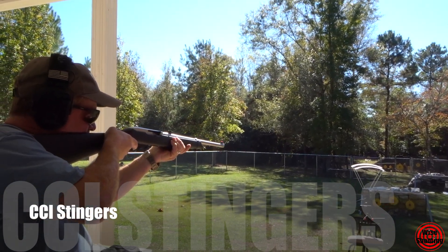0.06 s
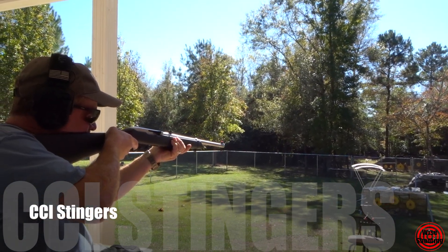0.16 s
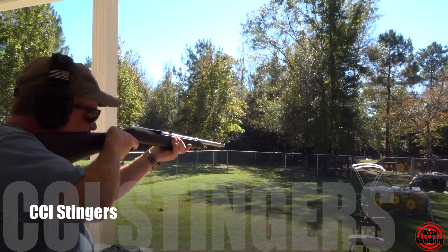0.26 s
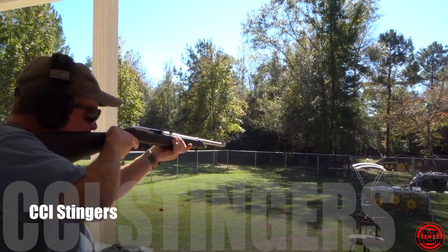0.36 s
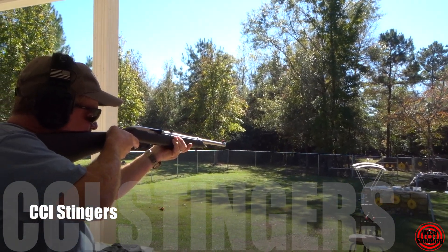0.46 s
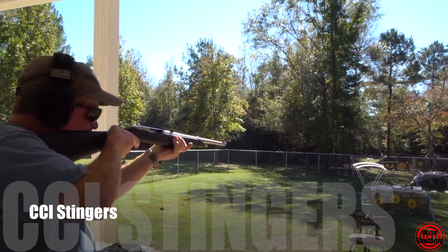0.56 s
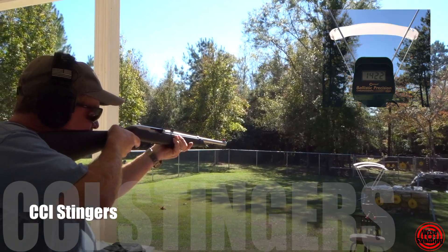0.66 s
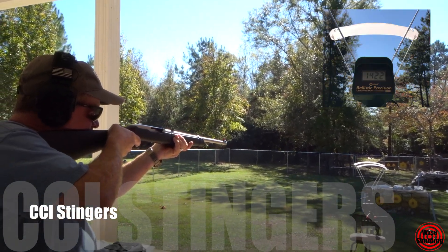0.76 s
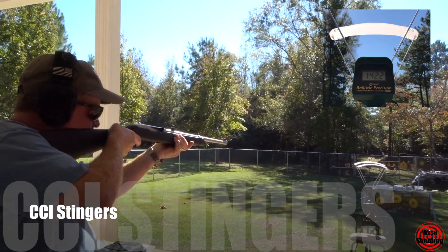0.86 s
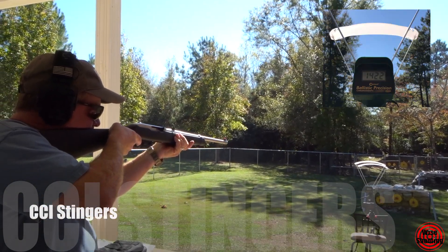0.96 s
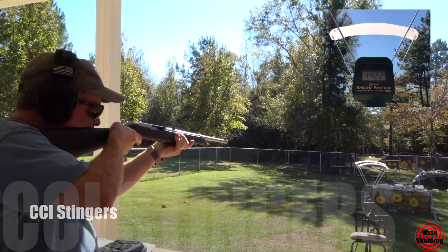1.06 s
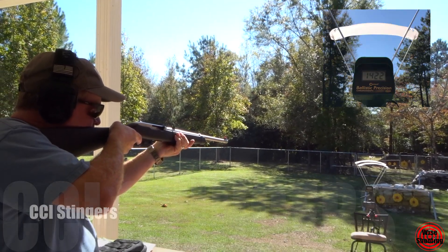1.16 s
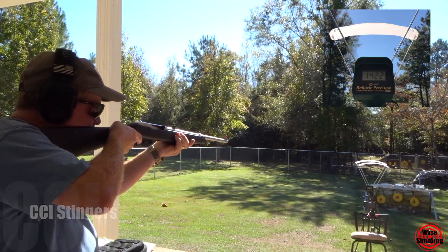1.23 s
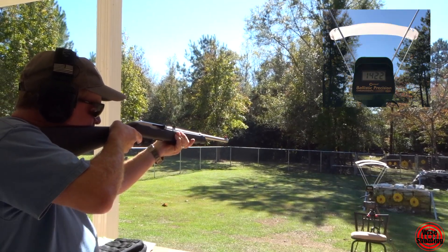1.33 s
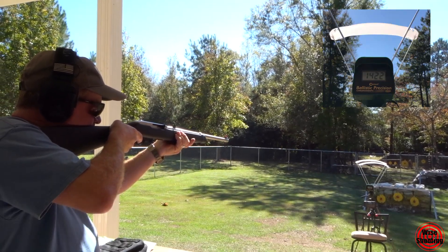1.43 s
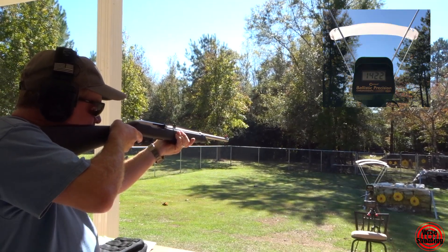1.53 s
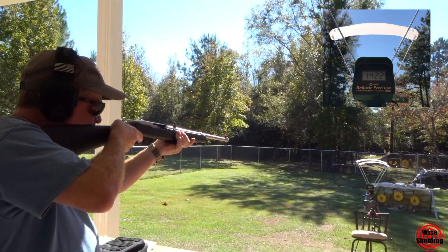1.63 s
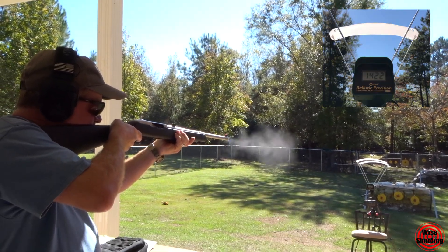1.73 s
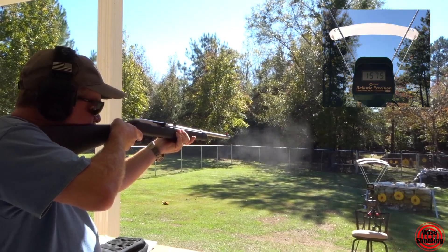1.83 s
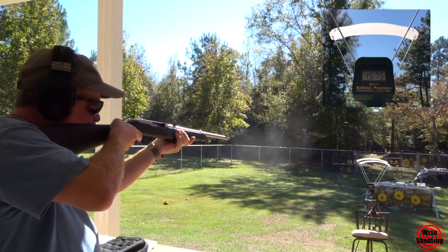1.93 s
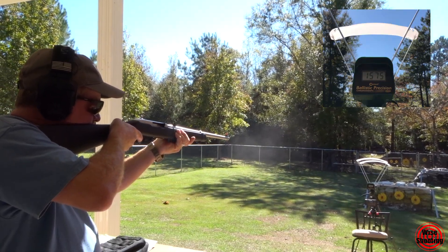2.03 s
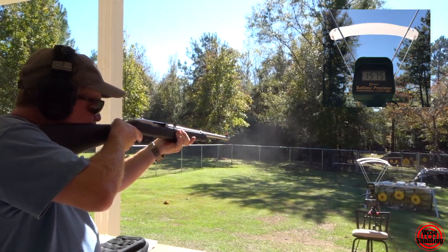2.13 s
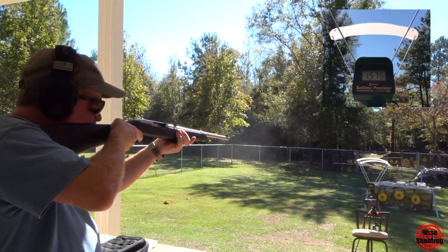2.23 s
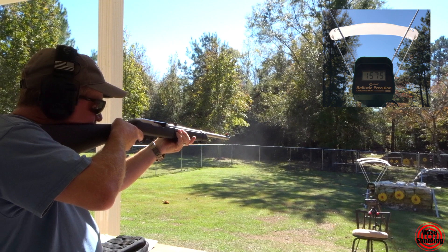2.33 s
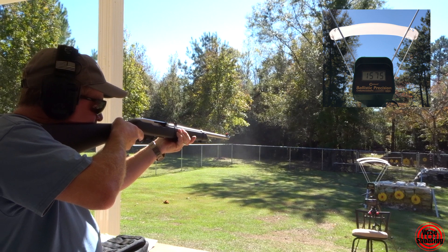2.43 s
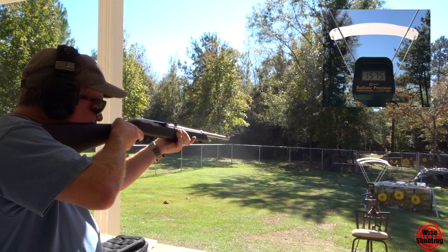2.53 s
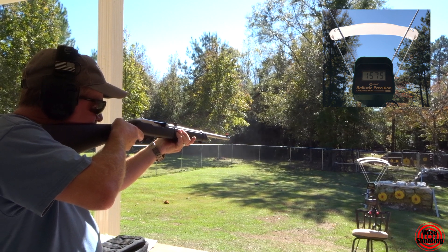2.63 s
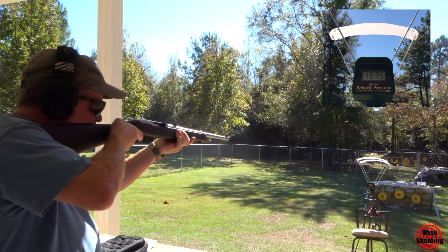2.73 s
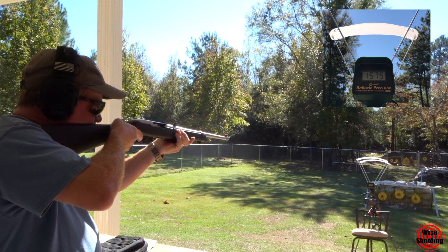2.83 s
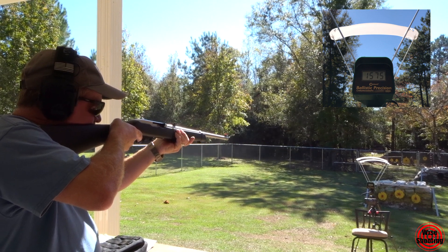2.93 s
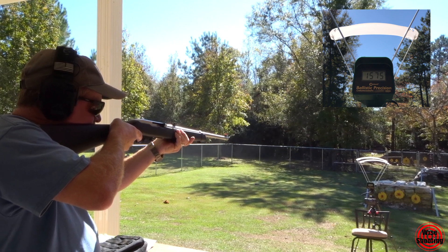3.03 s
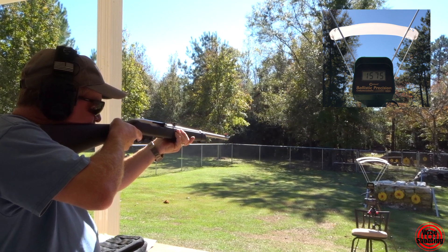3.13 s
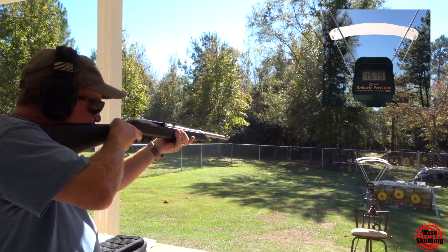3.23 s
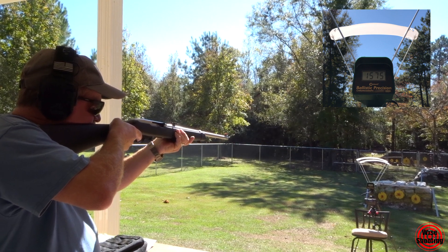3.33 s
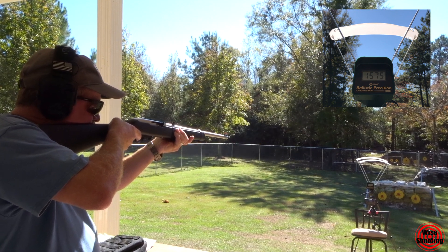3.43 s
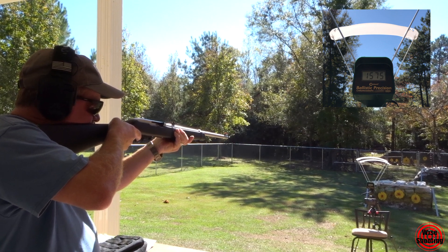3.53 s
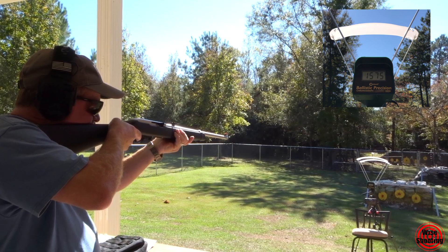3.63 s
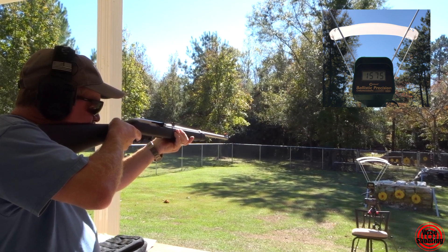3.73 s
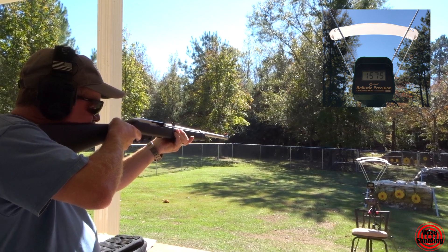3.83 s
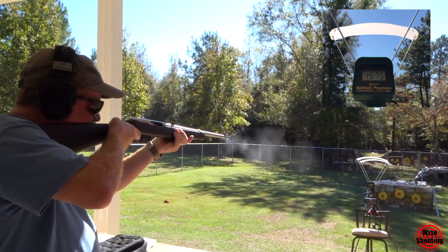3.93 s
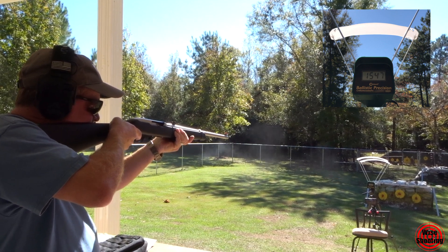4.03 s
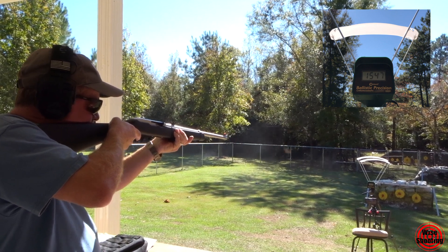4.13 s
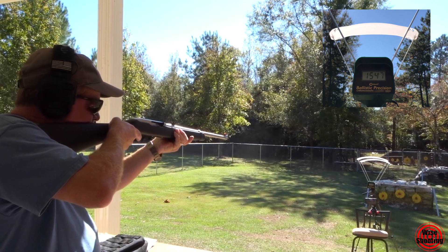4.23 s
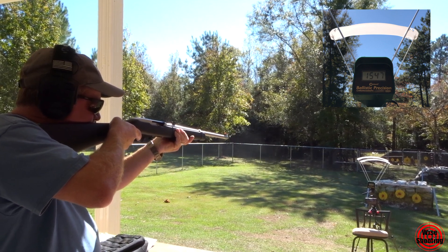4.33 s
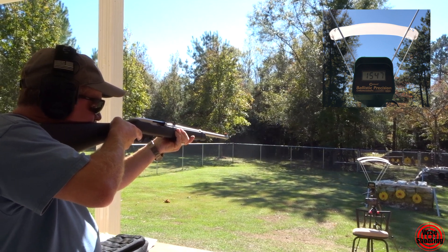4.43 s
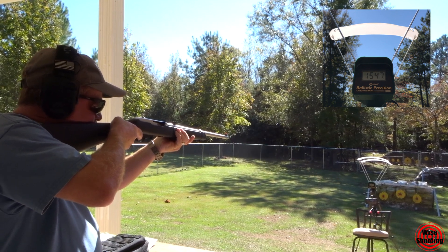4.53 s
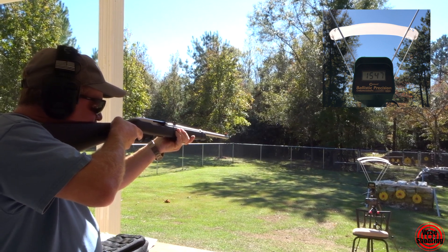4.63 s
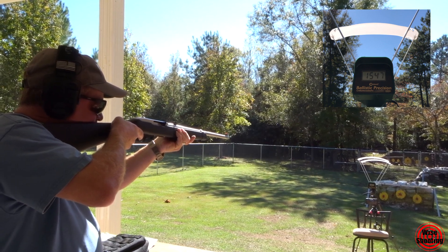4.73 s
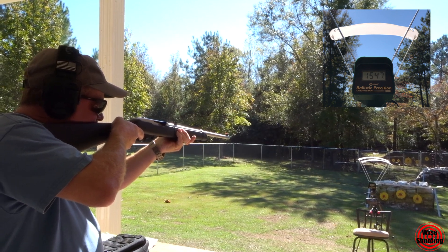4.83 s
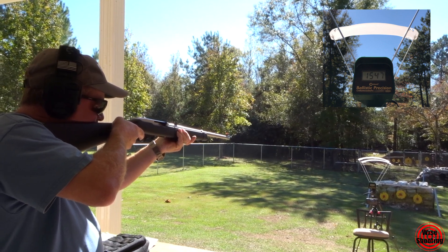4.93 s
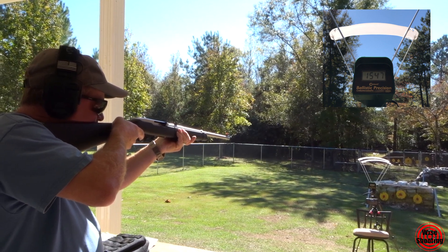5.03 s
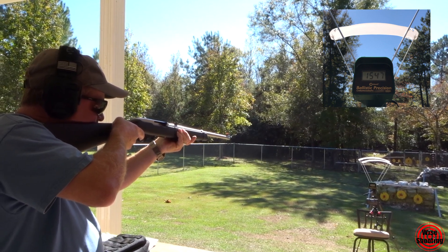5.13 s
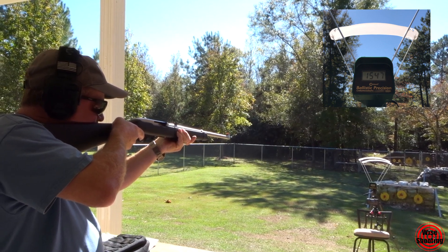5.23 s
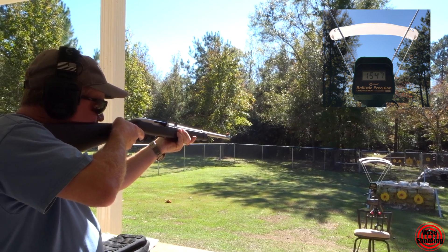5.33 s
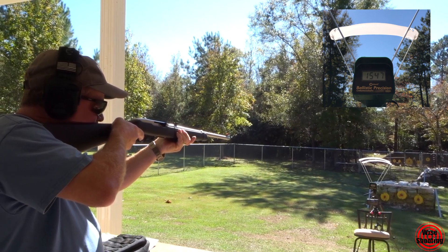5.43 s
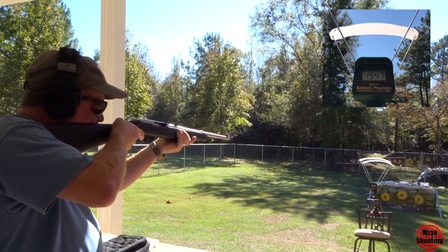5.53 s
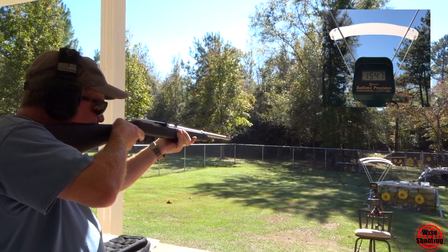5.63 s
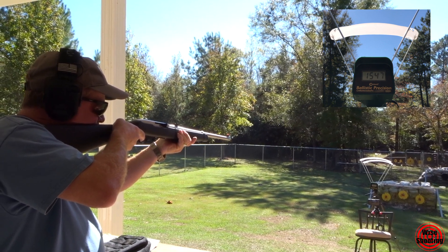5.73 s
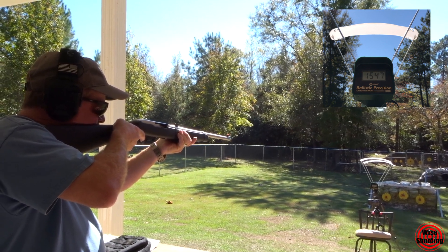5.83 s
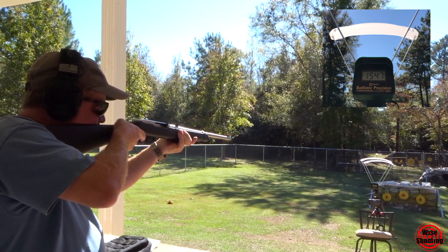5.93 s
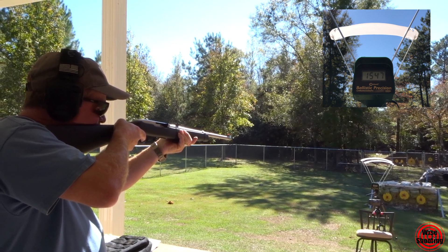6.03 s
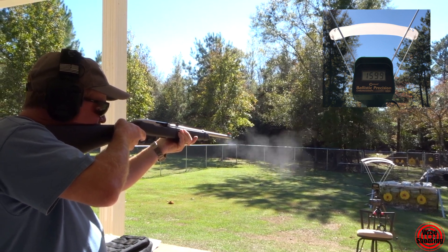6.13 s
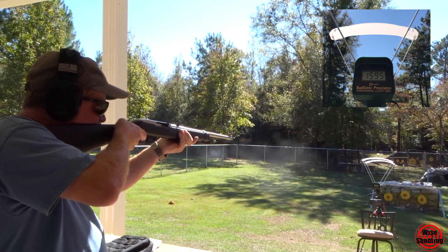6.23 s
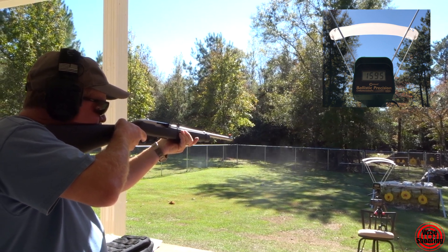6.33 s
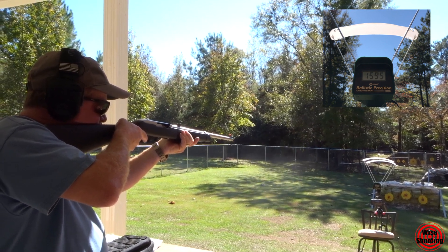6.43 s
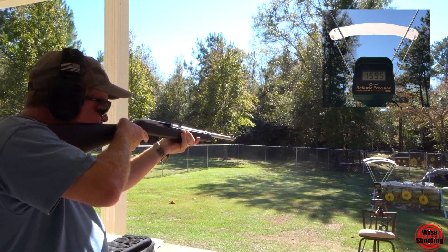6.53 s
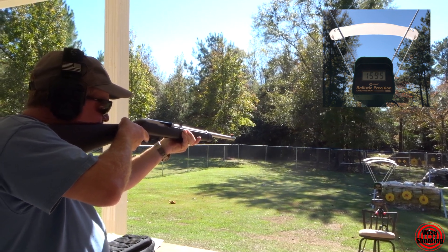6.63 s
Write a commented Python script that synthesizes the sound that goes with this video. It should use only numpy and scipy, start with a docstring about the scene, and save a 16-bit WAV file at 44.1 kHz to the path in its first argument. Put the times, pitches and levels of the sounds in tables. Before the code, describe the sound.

Over faint outdoor hiss and low wind, a small-caliber rifle cracks three times at a steady pace, close to the microphone. Every bullet strikes a hanging steel disc that rings briefly while the report rolls back from the trees around an open lawn. About half a second after each shot, a brass case lands on the porch with a light clatter. The trigger clicks quietly between shots.

```python
"""A small rifle fires three shots from a porch at a hanging steel disc, across a lawn ringed by trees.
Each muzzle pulse scatters back from the trees, the disc rings, the spent case bounces on the porch;
the trigger clicks between shots. Faint air hiss and low wind lie underneath. A stereo microphone with
a limiter stands by the shooter; a mono one ahead of the muzzle is mixed in slightly late."""
import sys
import numpy as np
from scipy import signal
from scipy.fft import rfft, irfft, next_fast_len
from scipy.io import wavfile
from scipy.ndimage import uniform_filter1d

SR = 44100
rng = np.random.default_rng(int(sys.argv[2]) if len(sys.argv) > 2 else 0)


def pcm_store(signal):
    """Save signal as 16-bit PCM."""
    levels = np.round(np.clip(np.atleast_2d(signal), -1, 1) * 32767)
    wavfile.write(sys.argv[1], SR, levels.astype(np.int16).T)


N = 294147
T = np.arange(N) / SR

# noise spectra, relative density (f/Hz, level/dB)
AIR_SPECTRUM = [(88, -53.5), (150, -16), (841, -5.5), (991, -5), (3780, -9.5), (4380, -10.5), (7450, -13),
                (10700, -17), (12000, -45), (15600, -63), (22000, -120)]  # outdoor hiss
WIND_SPECTRUM = [(12, -33.5), (20, -14.5), (60, -6), (162, -16.5), (230, -19), (331, -28), (400, -23),
                 (520, -43.5), (880, -120)]  # low wind
CLICK_SPECTRUM = [(200, -40), (600, -11), (1300, -2), (3000, -10), (5200, 3), (8000, -4.5), (9950, -0.5),
                  (10350, 3), (10900, 0), (11500, -39)]  # hammer, trigger, bullet strike
ECHO_SPECTRUM = [(100, -48.5), (250, -33), (380, -27.5), (520, -11.5), (900, 0), (1600, 4), (2700, 6.5),
                 (4200, 5.5), (7000, 1.5), (10800, -3.5), (11500, -42.5)]  # all returns
BOOM_SPECTRUM = [(60, -9), (200, -0.5), (350, -4), (600, -7.5), (1300, -1.5), (3000, -16), (6000, -30.5),
                 (15000, -36)]  # body of the blast
CRACK_SPECTRUM = [(150, -18.5), (700, 3), (2500, -11), (5000, 0), (9000, -10.5), (15500, -11)]  # bright edge of the blast
SLAP_SPECTRUM = [(50, -9.5), (250, -2.5), (600, -25), (1200, -17), (3000, 4), (6000, -6), (15000, -25.5)]  # slap from down the range
BOUNCE_SPECTRUM = [(150, -55), (500, -16), (1200, 4), (2200, 8), (2750, 8), (3600, 1.5), (5400, 0.5),
                   (7500, -10), (9900, -14), (10350, -3.5), (10900, -16.5), (11500, -43)]  # case on the porch
# stereo width (f/Hz, side minus mid/dB)
STEREO_WIDTH = [(100, -29.5), (300, -19), (700, -15), (1400, -6.5), (2800, -5), (5000, 0.5), (10000, -1)]
# shots (t/s, hammer/dB, echo/dB, disc/dB, hit place: 0 rim to 1 centre)
SHOTS = [(1.7232, -21, 7.5, 3.5, .1), (3.9196, -17.5, 5.6, 3.5, 0.93), (6.0985, -20.5, 4.7, 1.5, .03)]
# scattering zones: porch, woods all round, far tree line (delay/s, build-up/s, level/dB, t60/s)
SCATTER_ZONES = [(0, 0.012, -0.5, 0.51), (0, .03, -13.5, 4.43), (0.268, 0.047, -8, .9)]
# loss in air and leaves (f/Hz, rate/(dB/s))
PATH_LOSS = [(250, 3), (600, 0), (1000, 7.5), (2000, 15.5), (3200, 34), (4200, 49), (5200, 55), (7500, 73),
             (10000, 87.5)]
# single returns from posts, sheds and trunks (delay/s, level/dB)
REFLECTIONS = [(0.013, -11.5), (.044, -15), (.333, -20), (0.407, -37)]
# blasts ahead of the muzzle, relative levels (t/s, boom/dB, knock/dB, crack/dB, gas/dB, gas f/Hz, slap/dB)
BLASTS = [(1.7922, -13, -15, -13.5, -16.5, 61.4, -11.5), (3.9915, -12, -26, -13.5, -8.5, 60.4, -8.5),
          (6.171, -13.5, -12.5, -12.5, -15, 68.4, -11.5)]
# steel disc modes (f/Hz, t60/s, rim hit level/dB, centre hit level/dB)
DISC_MODES = [(501.5, 2.15, -39.5, -36), (1163, 2.23, -31, -33), (2073, 0.78, -18, -36.5),
              (2229, 1.2, -29, -20.5), (3372, 0.96, -15.5, -20), (4715, 0.65, -9.5, -17),
              (4890, 0.76, -39, -15), (6180, 0.79, -22.5, -45.5), (6544, 0.56, -15, -18.5),
              (7782, 0.49, -20.5, -44), (8400, 0.48, -14, -13), (8470, 0.37, -14, -24.5),
              (9496, 0.47, -35, -51.5), (10260, 0.55, -17.5, -32.5), (10630, 0.48, -61.5, -10.5),
              (12330, .6, -29.5, -42.5), (12900, .8, -20.5, -24.5), (14400, 0.73, -35.5, -46.5),
              (15150, .6, -18.5, -45), (15470, .8, -49.5, -18.5)]
# case landings (t/s, level/dB, tilt/(dB/octave))
CASE_BOUNCES = [(2.235, -20.5, 2), (2.367, -56, -1), (2.501, -26, -2), (2.813, -33, -8), (2.919, -45.5, -7),
                (2.991, -45.5, -7), (3.147, -45.5, -9), (3.281, -40.5, -4.5), (3.341, -45.5, -3),
                (3.533, -58, -7), (4.411, -21.5, -2.5), (4.58, -31.5, 1), (4.895, -33.5, -1),
                (5.016, -43, 0), (5.141, -47.5, 4.5), (6.611, -22, 0.5)]
# modes of case and floor (f/Hz, t60/s, level/dB)
CASE_MODES = [(1757, 0.4, -9.5), (2440, 0.29, -10), (2630, 0.18, -30), (3430, .08, -6), (5150, .08, -10),
              (9900, 0.32, -38)]
# trigger reset and take-up (t/s, click/dB, spring/dB)
TRIGGER_CLICKS = [(3.672, -46.5, -66), (3.754, -60, -81), (3.862, -52, -56.5), (5.53, -49, -73),
                  (5.613, -64, -83), (5.831, -50.5, -57), (5.917, -56, -63)]


def undb(db):
    """Decibels to gain."""
    return 10 ** (np.asarray(db) / 20)


def at(points, hz):
    """Interpolate (f, value) points over log frequency."""
    f, value = np.transpose(points)
    return np.interp(np.log(hz), np.log(f), value)


def fade(t, t60_s):
    """Exponential decay."""
    return np.exp(-np.log(1000) * t / t60_s)


def rise(t, rise_s):
    """Exponential approach to 1."""
    return 1 - np.exp(-t / rise_s)


def wander(t, step_s):
    """Random drift, one new value per step."""
    return np.interp(t / step_s, np.arange(len(t)), rng.standard_normal(len(t)))


def add(out, start_s, x):
    """Mix x into out."""
    i = int(start_s * SR)
    out[:, i:i + x.shape[-1]] += x[..., :N - i]


def noise(spectrum, size, tilt_db_oct=0, wide=True):
    """Two-channel noise, rms 1; if wide, the capsules agree only in the bass."""
    n = next_fast_len(size)
    hz = np.maximum(np.fft.rfftfreq(n, 1 / SR), 1)
    gain = undb(at(spectrum, hz) + tilt_db_oct * np.log2(hz))
    mid, side = rfft(rng.standard_normal((2, n)))
    width = undb(at(STEREO_WIDTH, hz)) * wide
    pair = (mid + width * side * np.array([[1], [-1]])) / np.hypot(1, width)
    x = irfft(gain * pair, n)[:, :size]
    return x / x.std()


def burst(spectrum, t60_s, rise_s, tail_db=-60, tail_t60_s=.3, tilt_db_oct=0, wide=True):
    """Noisy blow plus the weaker ring of its surroundings."""
    t = T[:SR]
    decay = fade(t, t60_s) + undb(tail_db) * fade(t, tail_t60_s)
    return noise(spectrum, SR, tilt_db_oct, wide) * rise(t, rise_s) * decay


def damped_sine(hz, t60_s=.067, rise_s=.0014):
    """A push that swings at one frequency and dies."""
    t = T[:SR // 2]
    return np.sin(2 * np.pi * hz * t) * rise(t, rise_s) * fade(t, t60_s)


def limiter_gain(x, ceiling_db, release_db_per_s):
    """Instant drop when x passes the ceiling, steady recovery."""
    power = uniform_filter1d(np.mean(x ** 2, axis=0), size=128)
    over_db = np.maximum(10 * np.log10(np.abs(power) + 1e-12) - ceiling_db, 0)
    held_db = np.maximum.accumulate(over_db + release_db_per_s * T) - release_db_per_s * T
    return undb(-held_db)


def gust(peak_s, width_s, lift_db=4):
    """Gain of one soft gust."""
    return undb(lift_db * np.exp(-((T - peak_s) / width_s) ** 2))


def air(level_db=-67, step_db=-6):
    """Outdoor hiss with an early gust; lower from the first shot on."""
    gain = undb(level_db + step_db * (T > SHOTS[0][0]))
    return gain * gust(peak_s=1.21, width_s=.16) * noise(AIR_SPECTRUM, N)


def wind(blasts, start_s=.625, level_db=-64, eddy_db=2):
    """Low wind is heard from 0.625 s on, flutters in eddies and gusts late; its level dips at each blast and
    recovers slowly."""
    flow = undb(level_db + eddy_db * wander(T, step_s=.063)) * gust(peak_s=5.69, width_s=.31)
    duck = limiter_gain(blasts, ceiling_db=-30.5, release_db_per_s=26)
    return (T > start_s) * flow * duck * noise(WIND_SPECTRUM, N, wide=False)


def rifle(muzzle_db=21, pulse_s=.00009, hammer_lead_s=.007, disc_lag_s=.131):
    """The hammer falls, a pressure pulse leaves the muzzle, trees and disc answer."""
    out = np.zeros((2, N))
    age = T[:SR // 100] / pulse_s
    pulse = np.diff(age * np.exp(-age))  # push, then longer weak suction
    for s, hammer_db, echo_db, disc_db, place in SHOTS:
        hammer = burst(CLICK_SPECTRUM, t60_s=.021, rise_s=.00056, tilt_db_oct=-1.5)
        add(out, s - hammer_lead_s, undb(hammer_db) * hammer)
        add(out, s, undb(muzzle_db) * pulse / pulse.max())
        add(out, s, undb(echo_db) * tree_echo())
        add(out, s + disc_lag_s, undb(disc_db) * steel_disc(place))
    return out


def scatter_envelope(t):
    """Each zone answers after its round trip, builds and decays; powers add."""
    power = 0
    for delay_s, build_s, db, t60_s in SCATTER_ZONES:
        age_s = np.maximum(t - delay_s, 0)
        power += (undb(db) * rise(age_s, build_s) * fade(age_s, t60_s)) ** 2
    return np.sqrt(power)


def tree_echo(clump_db=1, clump_s=.019, size=2 ** 17):
    """Dense, clumped returns plus a few single ones; longer paths lose more treble."""
    t = T[:size]
    hz = np.maximum(np.fft.rfftfreq(size, 1 / SR), 1)
    spectrum = rfft(noise(ECHO_SPECTRUM, size))
    bands_hz = np.geomspace(100, 13000, 15)
    out = np.zeros((2, size))
    for band_hz, pick in zip(bands_hz, np.eye(len(bands_hz))):
        band = irfft(spectrum * np.interp(np.log(hz), np.log(bands_hz), pick))
        out += band * undb(-at(PATH_LOSS, band_hz) * t)
    out *= scatter_envelope(t) * undb(clump_db * wander(t, clump_s))
    for delay_s, db in REFLECTIONS:
        dulled = [(f, level - at(PATH_LOSS, f) * delay_s) for f, level in ECHO_SPECTRUM]
        add(out, delay_s, undb(db) * burst(dulled, t60_s=.05, rise_s=.00078, wide=False))
    return out


def muzzle_blasts(swell_lead_s=.05, crack_lag_s=.011, gas_lag_s=.022, slap_lag_s=.117, knock_hz=385):
    """Ahead of the muzzle: low swell, knocking boom, crack, gas puff, slap from down the range."""
    out = np.zeros((2, N))
    swell_spectrum = [(180, -40), (290, -9), (370, 2.5), (520, -2.5), (900, -1.5), (2000, -38.5)]
    for s, boom_db, knock_db, crack_db, gas_db, gas_hz, slap_db in BLASTS:
        swell = burst(swell_spectrum, t60_s=.37, rise_s=.035, wide=False)
        boom = burst(BOOM_SPECTRUM, t60_s=.2, rise_s=.0009, tail_db=-32, tail_t60_s=.5, wide=False)
        knock = damped_sine(knock_hz, t60_s=.063, rise_s=.00052)
        crack = burst(CRACK_SPECTRUM, t60_s=.19, rise_s=.0004, wide=False)
        gas_puff = damped_sine(gas_hz)
        slap = burst(SLAP_SPECTRUM, t60_s=.027, rise_s=.0011, tail_db=-11, tail_t60_s=.11, wide=False)
        add(out, s - swell_lead_s, undb(-22) * swell)
        add(out, s, undb(boom_db) * boom)
        add(out, s, undb(knock_db) * knock)
        add(out, s + crack_lag_s, undb(crack_db) * crack)
        add(out, s + gas_lag_s, undb(gas_db + 5) * gas_puff)
        add(out, s + slap_lag_s, undb(slap_db) * slap)
        add(out, s + slap_lag_s, undb(slap_db - 10) * gas_puff)
    return out


def steel_disc(place, strike_db=-8, build_s=.089, waver_db=4, waver_step_s=.039, widen_db=4):
    """The bullet splashes; hit place weights the modes. The ring builds and wavers."""
    t = T[:2 * SR]
    out = np.zeros((2, len(t)))
    for hz, t60_s, rim_db, centre_db in DISC_MODES:
        spread_rad = np.arctan(undb(at(STEREO_WIDTH, hz) + widen_db)) * np.array([[1], [-1]])
        phase_rad = 2 * np.pi * (hz * t + rng.random())
        db = rim_db + place * (centre_db - rim_db) + waver_db * wander(t, waver_step_s)
        out += undb(db) * fade(t, t60_s) * np.sin(phase_rad + spread_rad)
    out *= rise(t, build_s)
    add(out, 0, undb(strike_db) * burst(CLICK_SPECTRUM, t60_s=.0074, rise_s=.00061))
    return out


def spent_cases():
    """Brass cases clatter on the porch, which rings briefly."""
    out = np.zeros((2, N))
    for s, db, tilt_db_oct in CASE_BOUNCES:
        clatter = burst(BOUNCE_SPECTRUM, t60_s=.19, rise_s=.0035,
                        tail_db=-16, tail_t60_s=.58, tilt_db_oct=tilt_db_oct)
        add(out, s, undb(db) * (clatter + case_clink(tilt_db_oct)))
    return out


def case_clink(tilt_db_oct, jitter_db=2):
    """Each landing weights the modes anew; a dull one rings the high modes less."""
    t, lowest_hz = T[:SR], CASE_MODES[0][0]
    out = np.zeros((2, SR))
    for hz, t60_s, db in CASE_MODES:
        gain = undb(db + tilt_db_oct * np.log2(hz / lowest_hz) + jitter_db * rng.standard_normal())
        out += gain * fade(t, t60_s) * np.sin(2 * np.pi * (hz * t + rng.random((2, 1))))
    return out


def trigger(spring_hz=5150, ping_hz=10350):
    """Reset and take-up: a click with the porch's ring, a ringing spring, a thin ping."""
    out = np.zeros((2, N))
    resonance = [(2 ** -.5, -35), (.9, -12), (1, 0), (1.1, -12), (2 ** .5, -35)]
    spring_spectrum = [(spring_hz * ratio, db) for ratio, db in resonance]
    for s, click_db, spring_db in TRIGGER_CLICKS:
        click = burst(CLICK_SPECTRUM, t60_s=.06, rise_s=.0073, tail_db=-8.5, tail_t60_s=.29)
        add(out, s, undb(click_db) * click)
        add(out, s, undb(spring_db) * burst(spring_spectrum, t60_s=.9, rise_s=.003))
        add(out, s, undb(click_db - 15) * damped_sine(ping_hz, t60_s=.57, rise_s=.002))
    return out


def overload(x, ceiling_db):
    """An overdriven microphone rounds the peaks."""
    return undb(ceiling_db) * np.tanh(x / undb(ceiling_db))


def porch_microphone(x, wind_cut_hz=270, top_hz=11100):
    """Overload, limiter, wind filter, drop in the top octave."""
    wind_cut = signal.butter(3, wind_cut_hz, "highpass", fs=SR, output="sos")
    top_cut = signal.ellip(5, .3, 22, top_hz, fs=SR, output="sos")
    limited = overload(x, ceiling_db=3) * limiter_gain(x, ceiling_db=-14.5, release_db_per_s=189.5)
    return signal.sosfilt(np.vstack([wind_cut, top_cut]), limited)


def scene():
    """Porch and forward microphones, plus low wind."""
    porch = porch_microphone(rifle() + spent_cases() + trigger() + air())
    forward = overload(muzzle_blasts(), ceiling_db=-5)
    return porch + forward + wind(forward)


def record(dry, top_hz=15900):
    """Steep recorder low-pass."""
    return signal.sosfilt(signal.ellip(10, .2, 80, top_hz, fs=SR, output="sos"), dry)


dry = scene()
out = record(dry)
pcm_store(out)
```